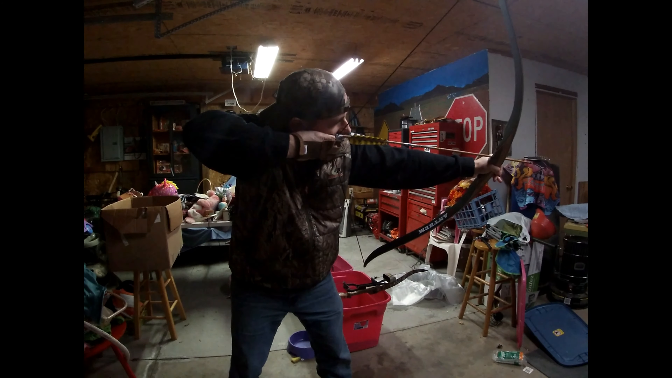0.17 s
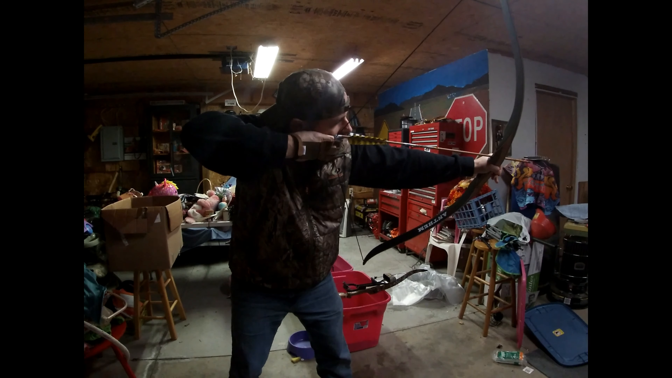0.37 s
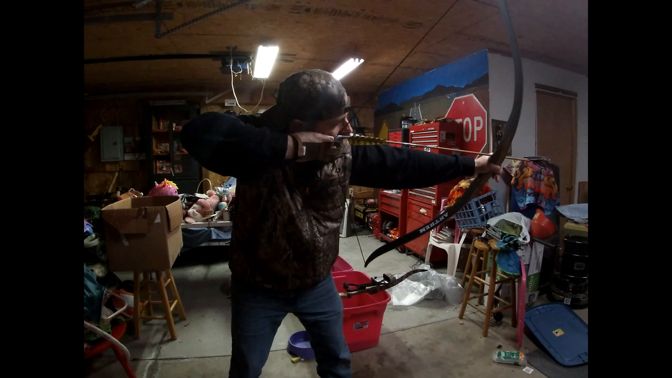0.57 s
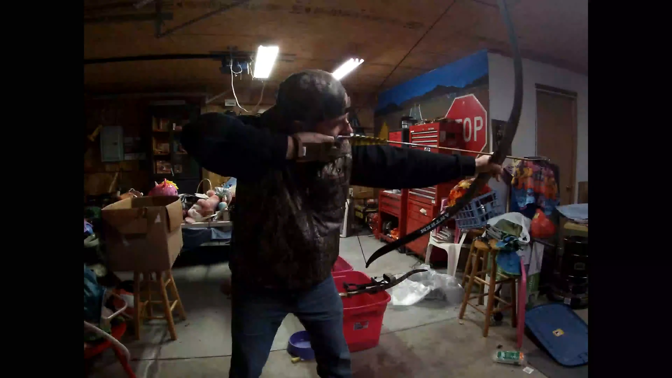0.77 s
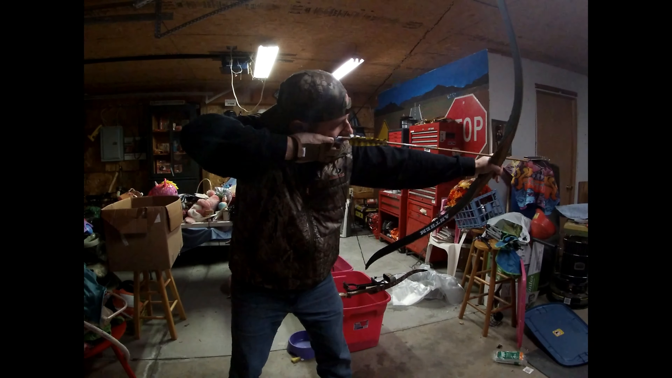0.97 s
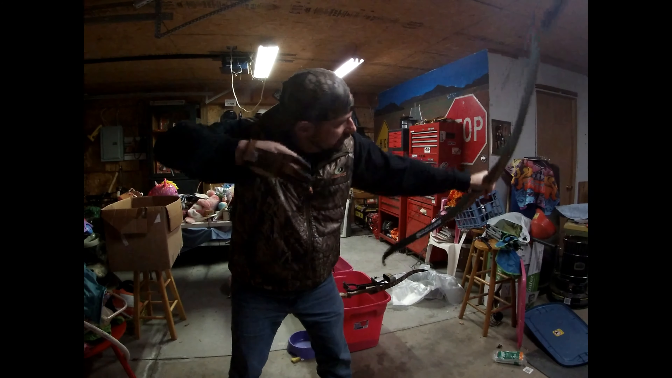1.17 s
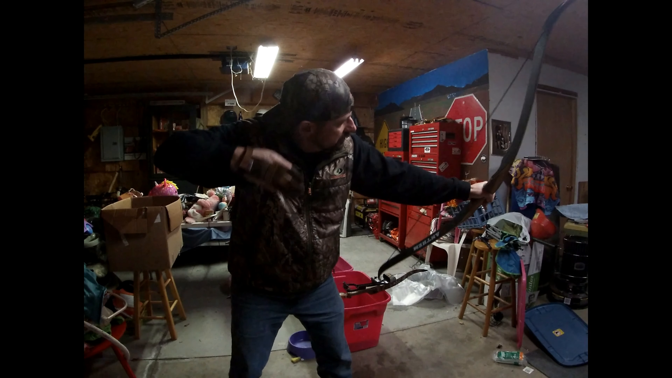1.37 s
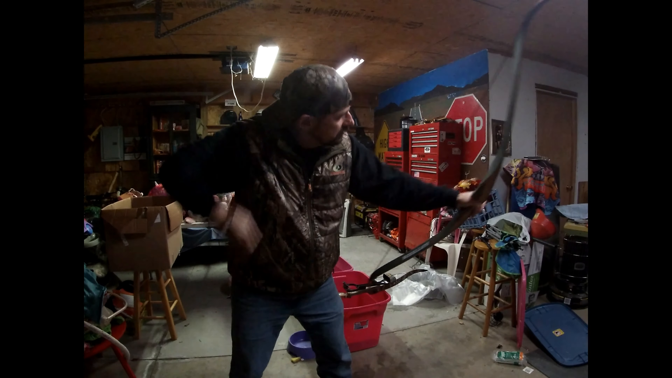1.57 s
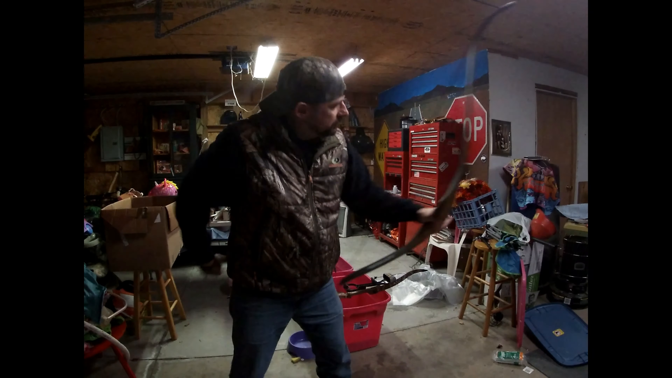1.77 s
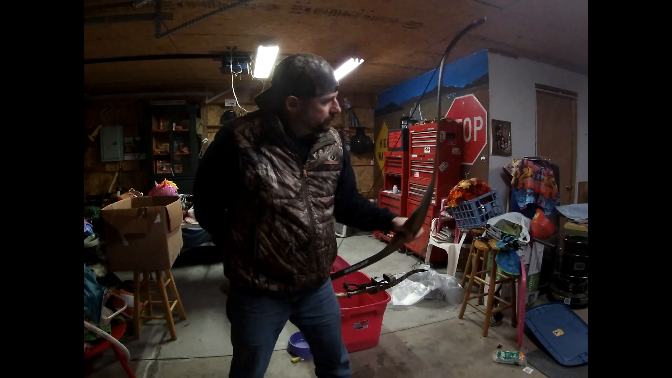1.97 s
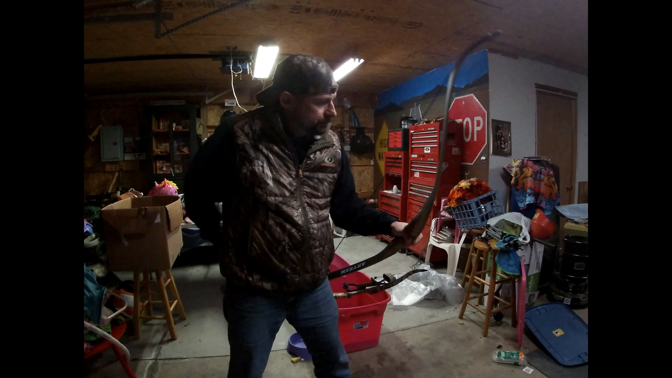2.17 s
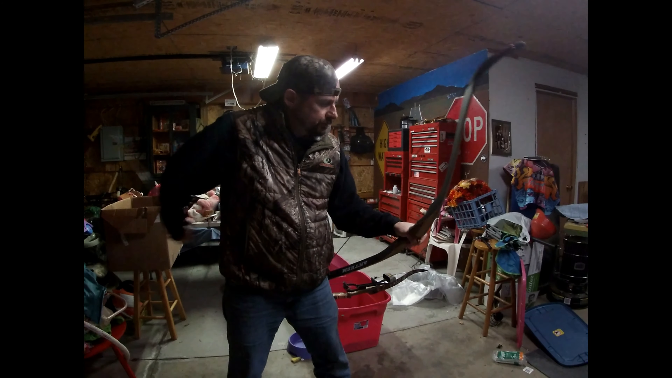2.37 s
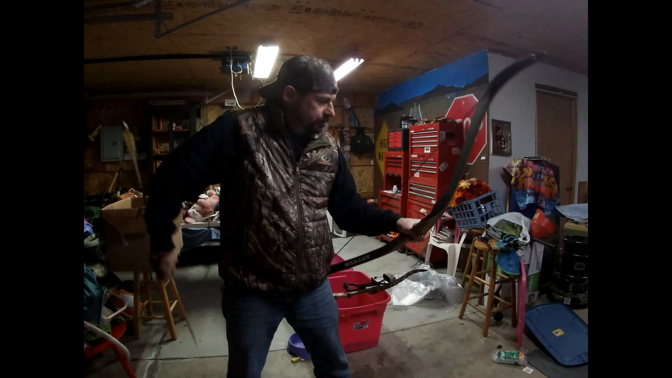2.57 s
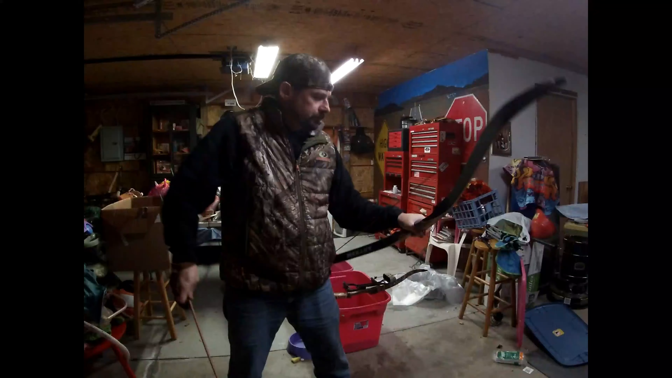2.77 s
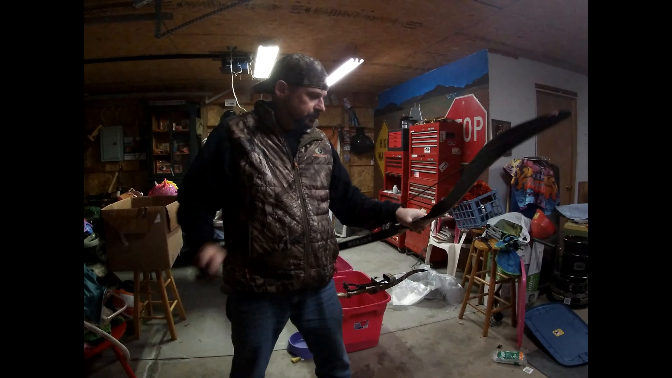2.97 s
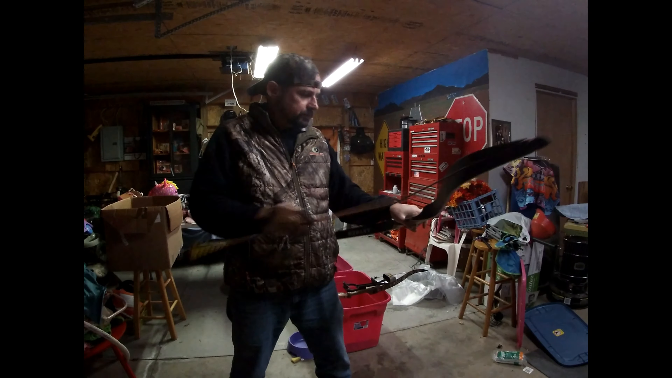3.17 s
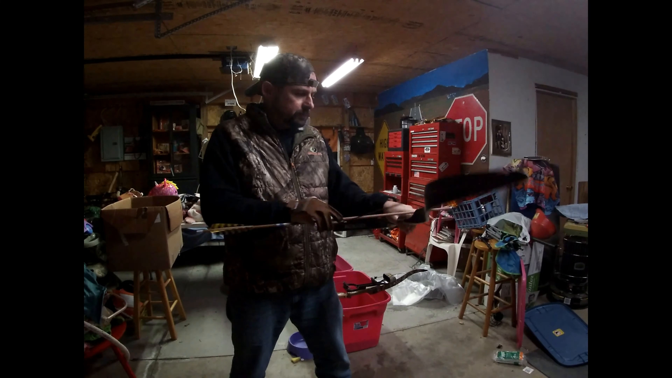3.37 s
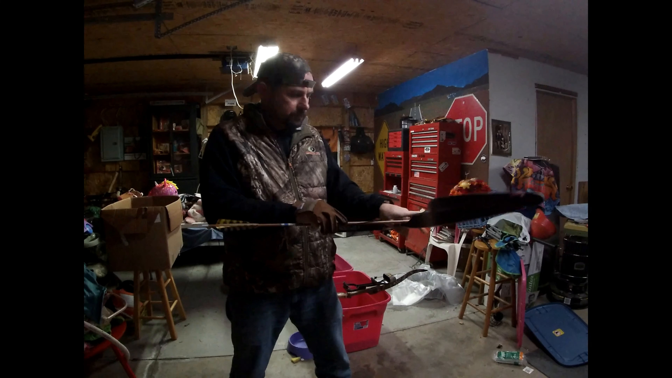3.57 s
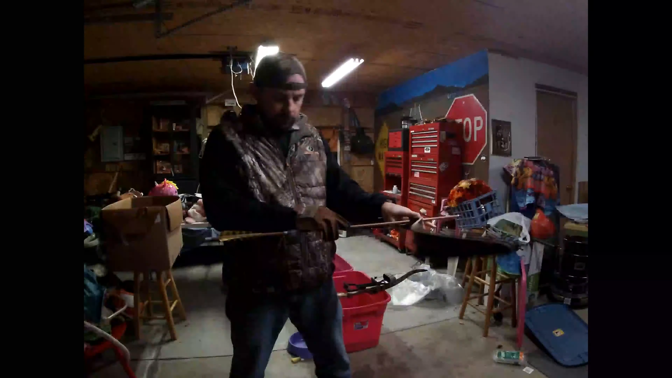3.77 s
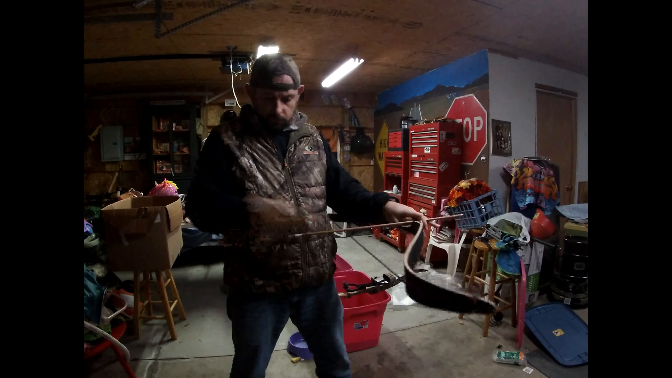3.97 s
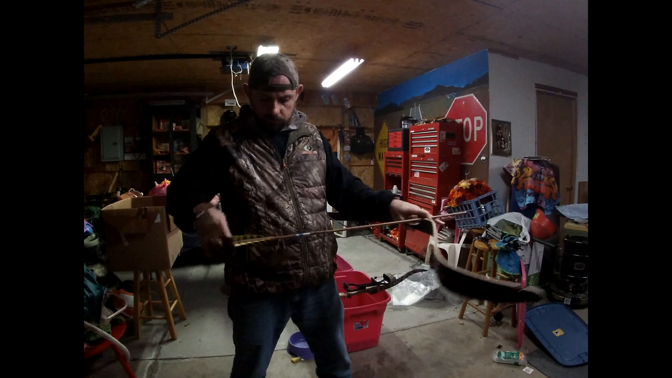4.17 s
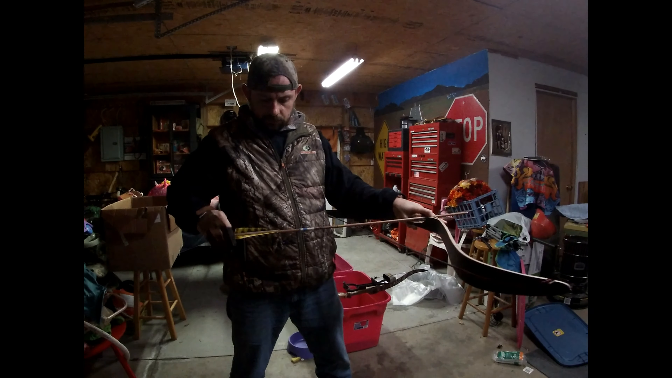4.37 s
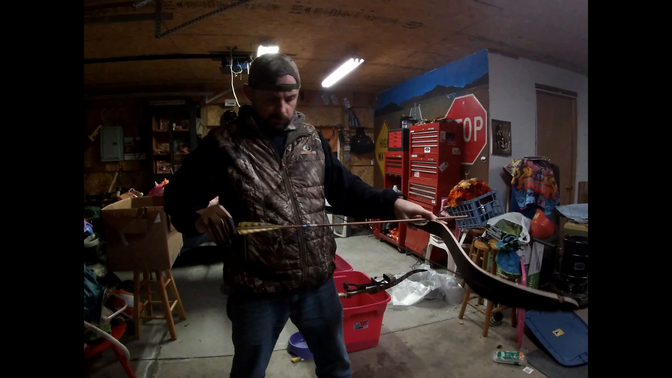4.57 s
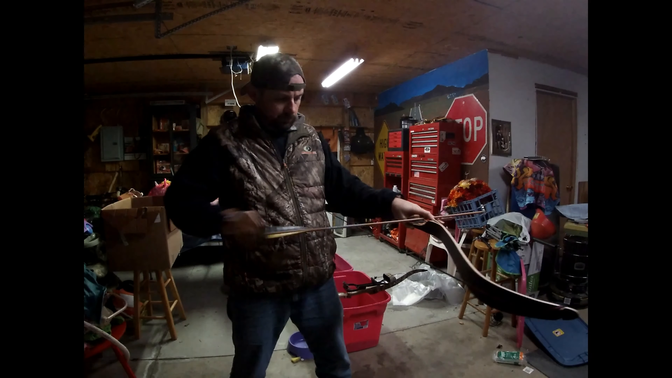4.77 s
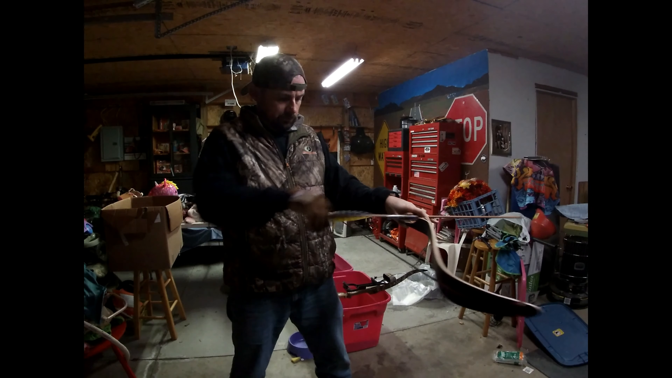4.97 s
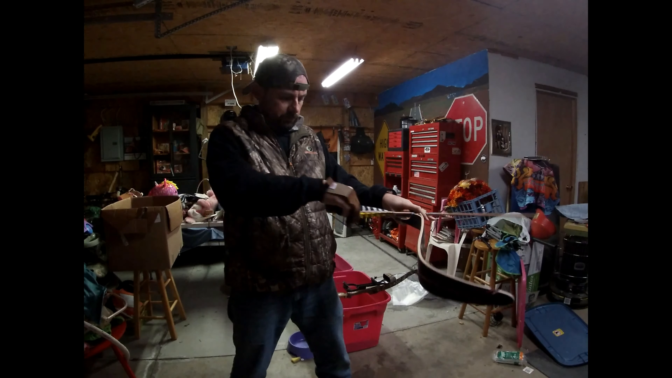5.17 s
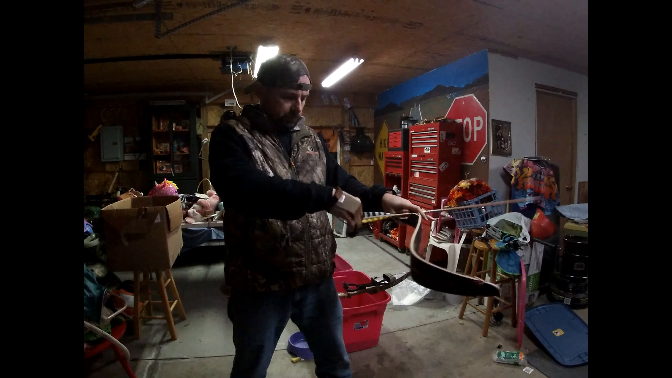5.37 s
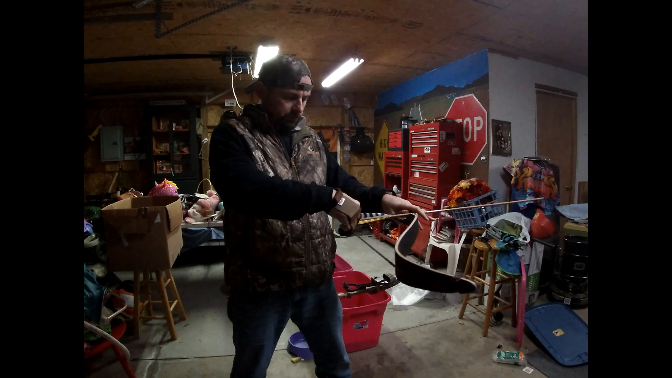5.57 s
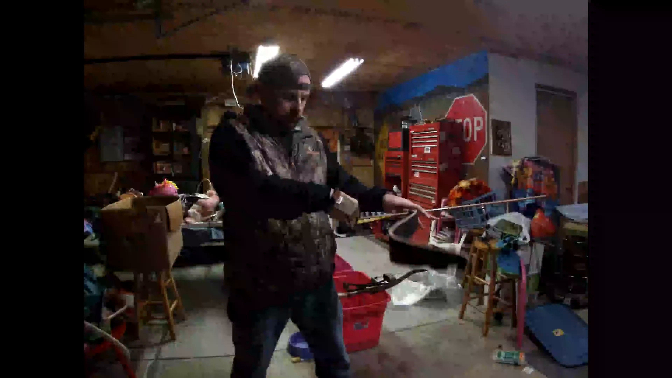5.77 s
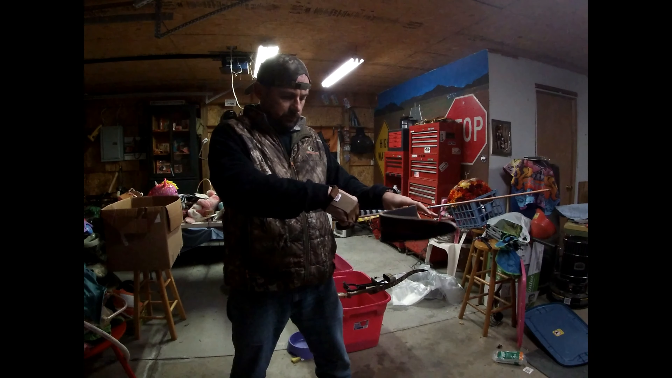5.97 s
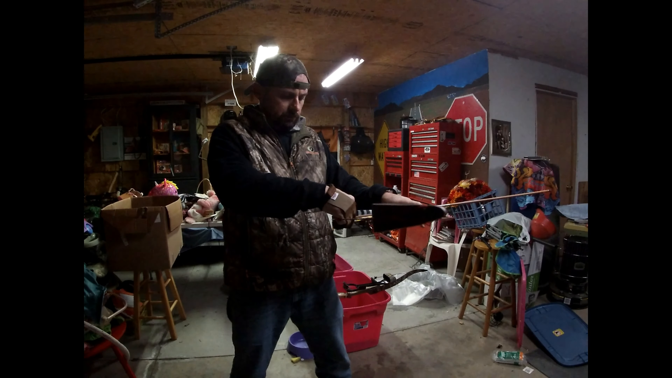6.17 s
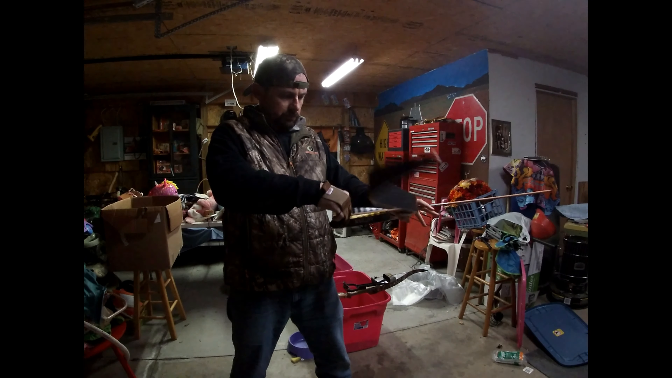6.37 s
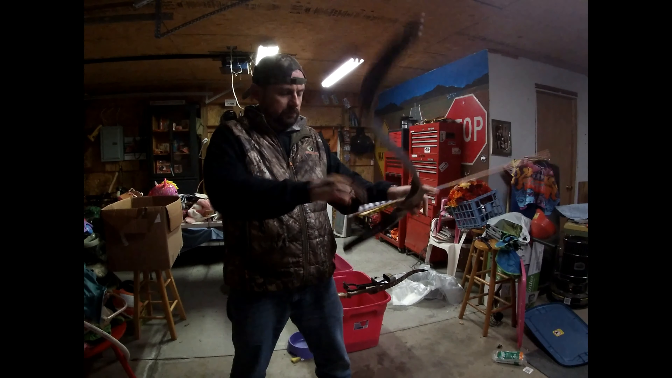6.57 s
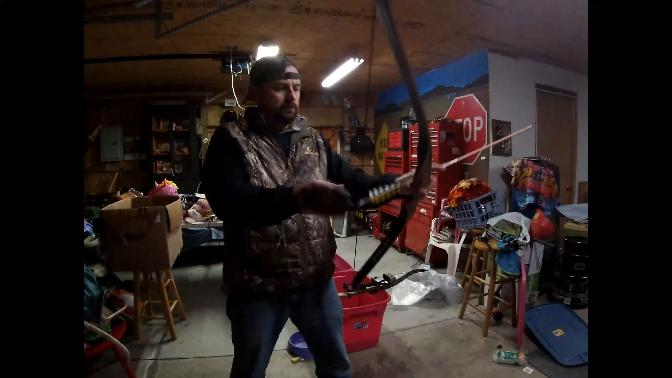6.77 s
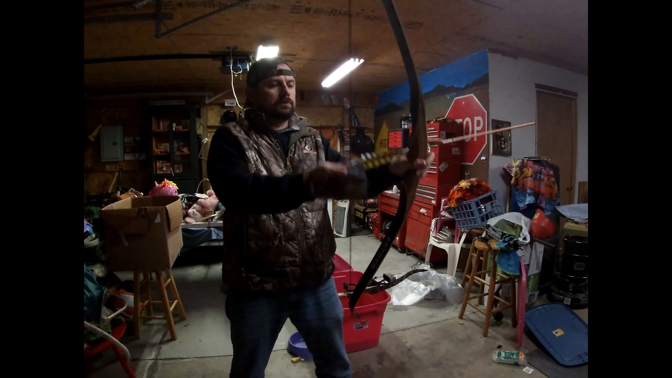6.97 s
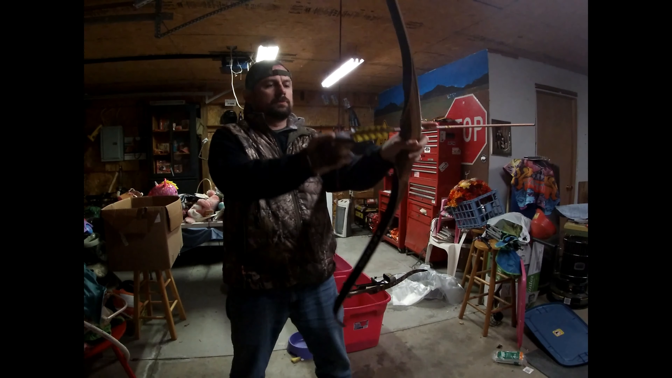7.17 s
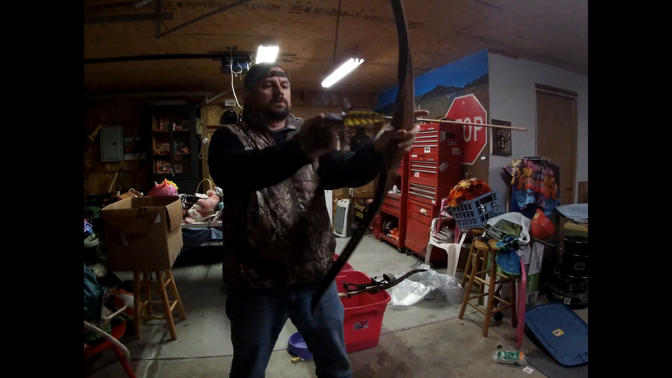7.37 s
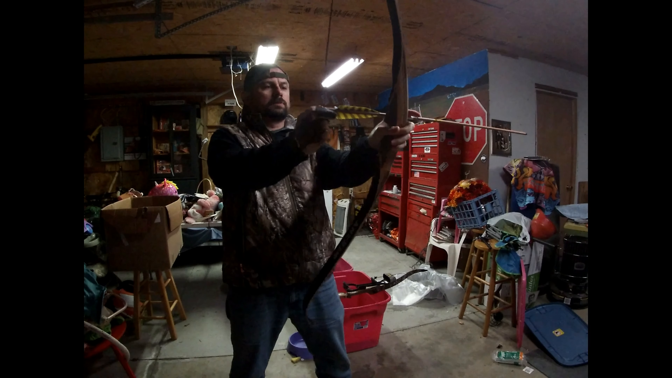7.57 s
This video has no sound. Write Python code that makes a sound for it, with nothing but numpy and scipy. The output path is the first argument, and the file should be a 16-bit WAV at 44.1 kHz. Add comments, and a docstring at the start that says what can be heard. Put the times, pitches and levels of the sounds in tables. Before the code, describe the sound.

A bowstring cracks and buzzes, the arrow smacks a target almost at once, then cloth rustles, an arrow ticks and slides, and its nock snaps on.

```python
"""Room air, a wavering hum, low drone, rumble and thin hiss lie under rustling clothes (all filtered noise, hum a sine).
A recurve bow is shot in a cluttered garage: cracks of noise for the string slaps, buzzing noise and ringing modes.
A tenth of a second later the arrow hits: a crack, a thwack, shuddering noise and a thud of low modes.
The arm brushes the vest; a new arrow ticks and knocks on the bow, then slides along the rest, grainy and squeaking.
Its nock snaps onto the string, which twangs as decaying modes until damped, with a fizz of noise."""
import sys
import numpy as np
from scipy import signal
from scipy.fft import rfft, irfft
from scipy.io import wavfile

SR = 44100
rng = np.random.default_rng(int(sys.argv[2]) if len(sys.argv) > 2 else 0)


def store_pcm(level_fs):
    """Save levels as 16-bit WAV."""
    pcm = np.round(np.clip(level_fs, -1, 1) * 32767).astype(np.int16)
    wavfile.write(sys.argv[1], SR, np.atleast_2d(pcm).T)


N = 335601
T = np.arange(N) / SR


def undb(db):
    """Decibels to gain."""
    return 10 ** (np.asarray(db) / 20)


def unit(x):
    """Scale to standard deviation 1."""
    return x / np.std(x)


def noise():
    """White noise."""
    return rng.standard_normal(N)


def walk(rate_hz):
    """Random wander: straight lines between normal draws."""
    return np.interp(T * rate_hz, np.arange(N), noise())


def over_hz(rows, hz):
    """Read (Hz, value) rows on a log-frequency axis."""
    row_hz, value = np.transpose(rows)
    return np.interp(np.log(hz + 1), np.log(row_hz), value)


def colour(x, rows):
    """Minimum-phase filter shaped by (Hz, relative dB) rows; white noise keeps its power."""
    size = 4096
    gain = undb(over_hz(rows, np.fft.rfftfreq(size, 1 / SR)))
    # folding the cepstrum forward makes the filter causal
    cepstrum = irfft(np.log(gain))
    cepstrum[1:size // 2] *= 2
    cepstrum[size // 2 + 1:] = 0
    response = irfft(np.exp(rfft(cepstrum)))
    return signal.oaconvolve(x, response / np.linalg.norm(response))[:N]


def resonate(x, hz, q):
    """One resonance with gain 1 at its centre."""
    return signal.lfilter(*signal.iirpeak(min(hz, SR / 3), max(q, 1), fs=SR), x)


def fade(t, t60_s):
    """Exponential decay by 60 dB per t60."""
    return np.exp(-np.log(1000) * t / t60_s)


def swell(start_s, rise_s, t60_s):
    """Envelope that builds up from a moment and dies away."""
    age = np.maximum(T - start_s, 0)
    return (1 - np.exp(-age / rise_s)) * fade(age, t60_s)


def hump(peak_s, length_s, shape=2, skew=1):
    """Rise to 1 and fall again; length is about the time above one half, skew squared is fall over rise."""
    away = 2 * (T - peak_s) / length_s
    return 2 ** -np.minimum(np.maximum(away / skew, -away * skew) ** shape, 60)


def humps(rows, shape=2, skew=1):
    """Sum of humps given as (peak s, relative dB, length s) rows."""
    return sum(undb(db) * hump(peak_s, length_s, shape, skew) for peak_s, db, length_s in rows)


def stroke(start_s, attack_s, hold_s, release_t60_s):
    """Straight attack, hold, then exponential release."""
    attack = np.clip((T - start_s) / attack_s, 0, 1)
    return attack * fade(np.maximum(T - start_s - attack_s - hold_s, 0), release_t60_s)


def add(track, start_s, sound):
    """Mix a sound into a track at a time."""
    i = int(start_s * SR)
    track[i:i + len(sound)] += sound[:N - i]


def ring(modes, start_s, rise_s):
    """Decaying sine modes, given as (Hz, relative dB, t60 s) rows, set ringing at a moment."""
    out, t = np.zeros(N), T[:2 * SR]
    tone = 0
    for hz, db, t60_s in modes:
        tone = tone + undb(db) * fade(t, t60_s) * np.sin(2 * np.pi * (hz * t + rng.random()))
    add(out, start_s, tone * (1 - np.exp(-t / rise_s)))
    return out


# Common spectrum of hard contacts. Each row: frequency in Hz, relative level in dB.
CONTACT_COLOUR = [(100, -14), (400, -5.5), (1000, -2), (1700, 0), (3000, 1), (6000, -3.5), (9500, -3.5),
                  (11500, -20.5), (15000, -30.5)]


def contacts(rows, q, focus_db, softness):
    """Noise cracks, each stressing the resonance of the spot hit; longer contacts start more softly."""
    out, t = np.zeros(N), T[:SR // 8]
    for start_s, db, t60_s, hz in rows:
        crack = rng.standard_normal(len(t))
        tinted = unit(crack + undb(focus_db) * unit(resonate(crack, hz, q)))
        onset = 1 - np.exp(-t / (softness * t60_s))
        add(out, start_s, undb(db) * fade(t, t60_s) * onset * tinted)
    return colour(out, CONTACT_COLOUR)


# Decay of the garage. Each row: frequency in Hz, t60 in s.
GARAGE_T60 = [(60, 0.34), (250, 0.51), (1000, 0.33), (4000, 0.34), (8000, 0.31), (14000, .27)]


def garage(x, wet_db):
    """Direct sound plus dense reflections from the clutter, each octave dying at its own rate."""
    t, build_s = T[:SR * 3 // 4], .0051
    spectrum = rfft(rng.standard_normal(len(t)))
    octave = np.log2(np.clip(np.fft.rfftfreq(len(t), 1 / SR), 64, 16384))
    tail = 0
    for k in range(6, 15):  # octaves centred on 2 ** k Hz
        band = irfft(spectrum * np.maximum(1 - abs(octave - k), 0), len(t))
        tail = tail + band * fade(t, over_hz(GARAGE_T60, 2 ** k))
    tail = tail * (1 - np.exp(-t / build_s)) ** 2
    return x + undb(wet_db) * signal.oaconvolve(x, tail / np.linalg.norm(tail))[:N]


# Spectrum of the room air. Each row: frequency in Hz, relative level in dB.
AIR_COLOUR = [(15, -38), (25, -7), (64, -5.5), (108, -13.5), (150, -2.5), (204, -8), (235, 4), (264, -15.5),
              (304, -13.5), (454, -24), (859, -15.5), (1110, -27), (1480, -23), (1960, -27.5),
              (7000, -36.5), (9100, -64), (15400, -120)]


def air():
    """Room air: coloured noise with a slight level wander."""
    # the closing row, out of order, holds all above 9 kHz at its level
    return colour(noise() * undb(.7 * walk(14)), list(AIR_COLOUR) + [(9000, -69)]) * undb(-64)


def hum():
    """A sine wavering in phase and level."""
    cycles = 232 * T + .1 * walk(8.2)
    return np.sin(2 * np.pi * cycles) * undb(-65 + 2.8 * walk(12))


def drone():
    """Noise through two equal resonances, louder for a while after the shot."""
    gain = undb(-75) + undb(-64) * hump(2.45, length_s=1.9, shape=3)
    return unit(resonate(resonate(noise(), 205, 1.8), 205, 1.8)) * gain


# Swells of the rumble. Each row: peak in seconds, relative level in dB, length in s.
RUMBLE_SWELLS = [(.08, -62, .3), (3.05, -62, .15), (3.47, -57.5, .3), (3.9, -63, .3), (4.5, -63.5, .35),
                 (5.52, -62, 0.27), (6.23, -64, .2)]


def rumble():
    """Low noise with a steady floor, swells and a wandering level."""
    gain = np.hypot(undb(-73), humps(RUMBLE_SWELLS)) * undb(2 * walk(7.8))
    return colour(noise(), [(12, -12), (28, 2.5), (60, -12), (130, -37), (500, -78)]) * gain


# Spectrum of the hiss. Each row: frequency in Hz, relative level in dB.
HISS_COLOUR = [(4000, -14), (6500, 5), (8000, -6.5), (10000, -2), (11500, -24), (15000, -24)]
# Spells in which the hiss sinks. Each row: start in seconds, length in s, nominal depth in dB.
HISS_LULLS = [(1.4, 1.85, 15.5), (4.1, 0.18, 9)]


def hiss():
    """Thin high noise that sinks now and then."""
    slew_s, sunk_db = .25, 0
    for start_s, length_s, depth_db in HISS_LULLS:
        inside_s = np.minimum(T - start_s, start_s + length_s - T)
        sunk_db = sunk_db + depth_db * np.clip(inside_s / slew_s + .5, 0, 1)
    return colour(noise(), [(1000, -47)] + HISS_COLOUR) * undb(-77 - sunk_db)


# Arm movements. Each row: fastest point in seconds, relative level in dB, length in s.
MOVES = [(.08, -62, 0.34), (.6, -66.5, 0.19), (1.14, -65.5, .1), (2.65, -73, .7), (2.93, -66.5, 0.077),
         (3.48, -60.5, 0.16), (3.82, -58.5, .34), (4.42, -59, 0.094), (5.25, -65.5, 0.4), (5.7, -69, .12),
         (6.01, -63.5, .12), (6.2, -71, 0.082), (6.44, -63, 0.12), (6.75, -61.5, 0.42), (7.31, -64, 0.34)]
# Spectrum of the rustle. Each row: frequency in Hz, relative level in dB.
CLOTH_COLOUR = [(200, -9.5), (700, -4.5), (2000, -0.5), (3500, 1), (6000, -1), (9500, -16), (11500, -24.5),
                (15000, -33.5)]


def cloth():
    """Grainy friction of sleeves and vest, and of the string leaving the fingers."""
    still_db = -78.5  # relative, archer standing still
    loose_s, loose_db, loose_time_constant_s = 1.175, -47, .014
    loose = undb(loose_db) * np.exp(-abs(T - loose_s) / loose_time_constant_s)
    motion = np.hypot(undb(still_db), humps(MOVES, shape=1.6, skew=1.05) + loose)
    grain = unit(noise() * undb(2 * walk(600) + 1.2 * walk(25)))
    return garage(colour(grain, CLOTH_COLOUR) * motion * undb(-1.5), wet_db=-6.5)


# Arrow leaving, string slapping the limbs.
# Each row: start in seconds, relative level in dB, t60 in s, resonance in Hz.
RELEASE = [(1.151, -42, .008, 3800), (1.1635, -46, .008, 3500), (1.179, -24, .03, 4200),
           (1.1818, -12.5, .016, 4300), (1.186, -18.5, .02, 6966), (1.1898, -12, 0.033, 3050),
           (1.195, -13, .03, 2850)]
# Spectrum of the string buzz. Each row: frequency in Hz, relative level in dB.
BUZZ_COLOUR = [(24, -28.5), (40, -2.5), (263, -4.5), (582, -12.5), (728, -5), (824, -10), (980, -6.5),
               (1820, -7), (2060, -5), (2220, -13), (3930, -15), (6950, -21), (15000, -61.5)]
# Limbs and string after the shot. Each row: frequency in Hz, relative level in dB, t60 in s.
BOW_MODES = [(69.6, -5, .36), (108, -7.5, .3), (177, -7, .25), (258, -7, 0.23), (403, -32, 1.8),
             (715, -12.5, 0.32), (1072, -11, 0.32), (1350, -13.5, .35), (1575, -8, .35), (1654, -5.5, 0.52),
             (1690, -4, .3), (1946, -10, .33), (2080, -3, 0.47), (2580, -10.5, 0.57), (3290, -8, 0.38),
             (3780, -10, 0.29)]


def shot():
    """The string slaps home, then buzzes on the limbs once a swing while the bow rings and shoves the air."""
    slaps = contacts(RELEASE, q=8.1, focus_db=3, softness=.026) * undb(-2)
    swing_hz = BOW_MODES[0][0]
    swing = 1 + .5 * np.cos(2 * np.pi * swing_hz * (T - 1.197))
    buzz = colour(noise() * swing * swell(1.183, rise_s=.009, t60_s=.3), BUZZ_COLOUR) * undb(-17)
    limbs = ring(BOW_MODES, 1.186, rise_s=.0047) * undb(-20)
    push = unit(colour(noise(), [(15, -15), (45, 0), (60, -3), (100, -30), (300, -69)]))
    shove = push * swell(1.176, rise_s=.01, t60_s=.35) * undb(-28)
    return garage(slaps, wet_db=-3.5) + garage(buzz, wet_db=-2) + garage(limbs, wet_db=-17.5) + shove


# Arrow striking and sinking in.
# Each row: start in seconds, relative level in dB, t60 in s, resonance in Hz.
IMPACT = [(1.2958, -8.5, .022, 3610), (1.2975, -15.5, .014, 5980), (1.3055, -22, .018, 3700),
          (1.3135, -23, .03, 1396)]
# Spectrum of the shudder. Each row: frequency in Hz, relative level in dB.
SHUDDER_COLOUR = [(30, -25), (120, -15.5), (250, -6.5), (380, -16), (520, -9), (900, -10), (1600, -10.5),
                  (2400, -17), (3500, -10), (6000, -20.5), (9500, -28.5), (11500, -44.5), (15000, -52.5)]
# Target and stand. Each row: frequency in Hz, relative level in dB, t60 in s.
TARGET_MODES = [(62, -10.5, .16), (112, -9, 0.13), (178, -0.5, 0.21), (250.4, -0.5, 0.31), (602, -13, 0.3),
                (880, -11, 0.33), (1007, -10.5, .35), (204, -37, 2.5)]


def target():
    """The point cracks in, the face thwacks and thuds, the shaft shudders until the target grips it."""
    crack = contacts(IMPACT, q=2, focus_db=-8.5, softness=.0092) * undb(-2)
    face_colour = [(40, -12), (200, -3.5), (380, -11.5), (650, 0), (1300, -3), (2500, -14), (8000, -40.5)]
    thwack = colour(noise() * swell(1.296, rise_s=.0005, t60_s=.07), face_colour) * undb(-17)
    shudder_s, sag_t60_s = 1.296, .75
    grip = stroke(shudder_s, attack_s=.001, hold_s=.099, release_t60_s=.17)
    grip = grip * fade(np.maximum(T - shudder_s, 0), sag_t60_s)
    shudder = colour(unit(noise() * undb(3.1 * walk(300))) * grip, SHUDDER_COLOUR) * undb(-24.5)
    thud = ring(TARGET_MODES, 1.301, rise_s=.004) * undb(-21)
    return garage(crack, wet_db=-.5) + garage(shudder + thwack, wet_db=-5) + garage(thud, wet_db=-16)


def swish():
    """The drawing arm drops along the vest, then brushes it lightly while hanging: coloured noise."""
    drop = undb(-59) * hump(2.135, length_s=.13, shape=1.3, skew=.8)
    hang = undb(-72.5) * hump(2.3, length_s=.8)
    vest_colour = [(300, -26), (1000, -8.5), (1900, -1), (3000, -6.5), (5500, -10.5), (8000, -29),
                   (10000, -29), (12000, -42)]
    return garage(colour(noise(), vest_colour) * (drop + hang) * undb(-2), wet_db=-6.5)


# Arrow shaft and fingers tapping the bow.
# Each row: start in seconds, relative level in dB, t60 in s, resonance in Hz.
TAPS = [(3.4435, -53.5, 0.028, 4920), (3.5138, -50.5, 0.063, 2640), (3.589, -39, 0.026, 5600),
        (3.595, -17, 0.012, 4900), (3.6312, -21, 0.01, 4500), (3.657, -28.5, 0.02, 2780),
        (3.677, -36, 0.013, 4500), (3.8623, -44.5, 0.049, 2800), (3.89, -49, 0.029, 1930),
        (4.0127, -59.5, .04, 3000), (4.331, -53, 0.019, 6870), (4.345, -50, 0.022, 2000),
        (4.368, -52, 0.025, 3520), (4.4005, -52, 0.068, 3260), (4.5804, -52, 0.028, 6600),
        (4.6799, -61, 0.017, 3500), (4.958, -50, 0.0087, 5000), (5.056, -47, 0.011, 4000),
        (5.099, -50.5, .03, 2200), (5.3417, -56.5, 0.1, 1880), (5.4775, -46.5, 0.012, 2483),
        (5.8889, -61.5, 0.036, 4970), (5.9698, -61, 0.038, 3500), (6.0381, -57.5, 0.018, 3630),
        (6.4162, -53, 0.051, 5500), (6.4848, -17.5, 0.0074, 5500), (6.7173, -45, 0.092, 6100),
        (7.4502, -41.5, 0.0045, 5800)]
# Arrow shaft on the rest. Each row: frequency in Hz, relative level in dB, t60 in s.
SHAFT_MODES = [(474, -21, 0.074), (1660, -7.5, 0.028), (2150, -7, 0.038), (2650, -2.5, 0.047),
               (2973, 0.5, 0.037), (3500, -7, 0.029), (4570, -3, 0.017), (5310, -3, 0.037)]
# Dull knocks on the wooden handle. Each row: start in seconds, relative level in dB, t60 in s, pitch in Hz.
KNOCKS = [(3.5955, -31.5, 0.044, 1146), (3.6315, -38, 0.034, 1040), (3.657, -37.5, 0.042, 976),
          (4.895, -56.5, 0.078, 790), (5.1, -46, 0.052, 810), (5.112, -46.5, 0.048, 778),
          (5.345, -58, .05, 785), (5.479, -50, 0.047, 785)]


def taps():
    """Light contacts tick and briefly ring the arrow shaft; decaying sines knock the handle."""
    ticks = contacts(TAPS, q=1.95, focus_db=2.5, softness=.035) * undb(-.5)
    shaft, shaft_ring = np.zeros(N), ring(SHAFT_MODES, 0, rise_s=.00025)[:SR // 5]
    for start_s, db, t60_s, _ in TAPS:
        push = min(t60_s / .012, 1)  # the briefest ticks move the shaft less
        add(shaft, start_s, undb(db) * push * shaft_ring)
    knocks, t = np.zeros(N), T[:SR // 8]
    for start_s, db, t60_s, hz in KNOCKS:
        add(knocks, start_s, undb(db) * fade(t, t60_s) * np.sin(2 * np.pi * hz * t))
    return garage(ticks + shaft * undb(-11.5), wet_db=-2.5) + garage(knocks * undb(-.5), wet_db=-9)


# Spectrum of the sliding shaft. Each row: frequency in Hz, relative level in dB.
SLIDE_COLOUR = [(400, -29), (800, -18), (1400, -16.5), (3000, -3.5), (4200, -2.5), (5800, 0.5), (7800, -4),
                (9800, 1.5), (11400, -22), (15000, -24)]


def slide():
    """One pull of the shaft along the rest: grainy friction noise."""
    pull = stroke(4.82, attack_s=.098, hold_s=.19, release_t60_s=.16) * undb(-48.5)
    grain = unit(noise() * undb(2 * walk(450) + 1.6 * walk(60)))
    return garage(colour(grain, SLIDE_COLOUR) * pull, wet_db=-6.5)


# Shaft catching as the pull starts and stops. Each row: peak in seconds, relative level in dB, length in s.
SQUEAKS = [(4.865, -54, 0.05), (5.056, -46, .045)]


def squeak():
    """Rough stick-slip whose pitch rises and falls with the speed of the sliding shaft."""
    crawl_hz, fast_hz = 3000, 5670
    hz = crawl_hz + (fast_hz - crawl_hz) * hump(4.995, length_s=.115)
    tremble = .04 * walk(2500) + .04 * walk(90)
    phase = 2 * np.pi * np.cumsum(hz * (1 + tremble)) / SR
    tone = np.sin(phase) + undb(-7) * np.sin(2 * phase)
    return garage(tone * undb(5.3 * walk(220)) * humps(SQUEAKS, shape=1.4), wet_db=-6.5)


# String plucked by the nock. Each row: frequency in Hz, relative level in dB, t60 in s.
STRING_MODES = [(530, -14, 0.91), (714.7, -8.5, 0.38), (892, -14, 0.36), (1274, -19, 0.36),
                (1470, -19, 0.3), (1630, -18, 0.24), (1679, 1, 0.3), (1697, -10, 0.27), (1840, -15, 0.33),
                (2052, 2, 0.2), (2315, 3, 0.11), (2317, 5.5, 0.12), (2531, -11, 0.18), (2770, -9.5, .16),
                (4260, -23, .16), (5000, -24, .17), (5440, -5.5, 0.12)]


def twang():
    """The nock plucks the taut string, which rings until the fingers damp it; the shaft fizzes along."""
    damping = fade(np.maximum(T - 6.695, 0), t60_s=.13)
    tone = ring(STRING_MODES, 6.4865, rise_s=.0021) * damping * undb(-26.5)
    fizz_colour = [(200, -32), (700, -5), (1300, -12), (2400, 9), (3700, -7), (5300, 4.5), (7000, -10),
                   (9500, -3.5), (11500, -27), (15000, -29)]
    fizz = colour(noise() * swell(6.486, rise_s=.00085, t60_s=.24), fizz_colour) * undb(-30)
    return garage(tone, wet_db=-13) + garage(fizz, wet_db=-6)


def scene():
    """Everything reaches both channels alike."""
    background = air() + hum() + drone() + rumble() + hiss()
    archer = cloth() + shot() + target() + swish() + taps() + slide() + squeak() + twang()
    mono = background + archer
    return np.array([mono, mono])


def record(dry):
    """Round the loudest peaks and cut the treble above 15.5 kHz."""
    rounded = np.tanh(1.22 * dry) / 1.177
    return signal.sosfilt(signal.ellip(8, .2, 70, 15500, fs=SR, output="sos"), rounded)


dry = scene()
out = record(dry)
store_pcm(out)
```